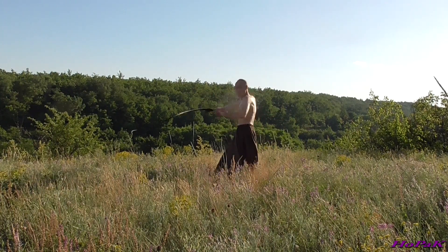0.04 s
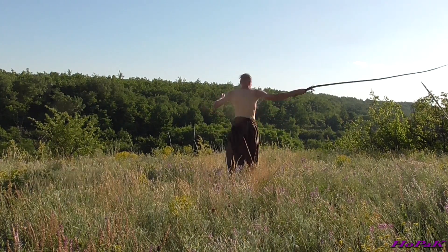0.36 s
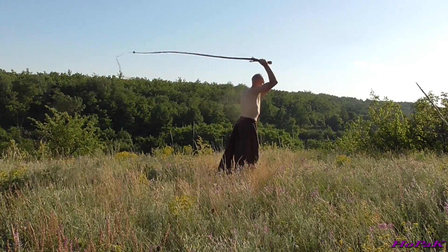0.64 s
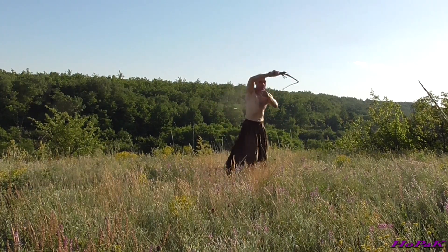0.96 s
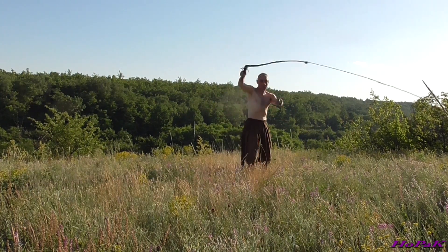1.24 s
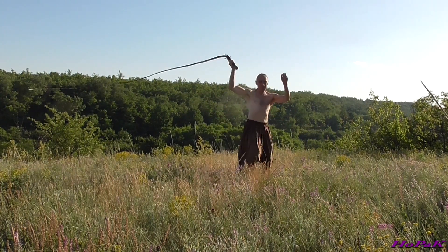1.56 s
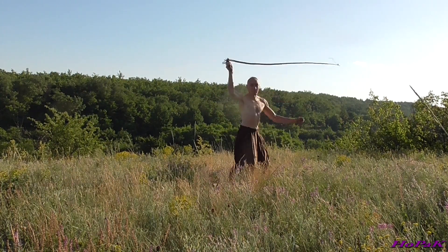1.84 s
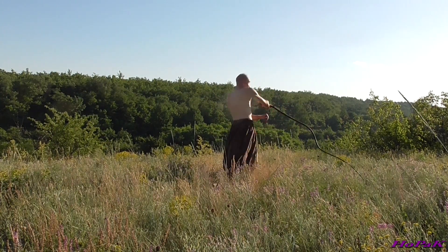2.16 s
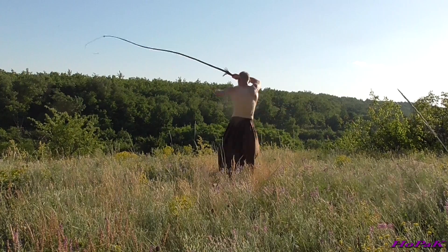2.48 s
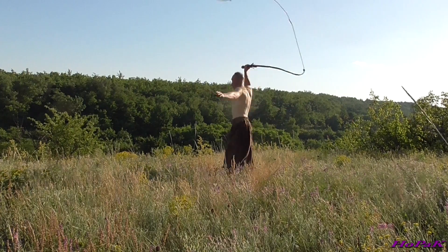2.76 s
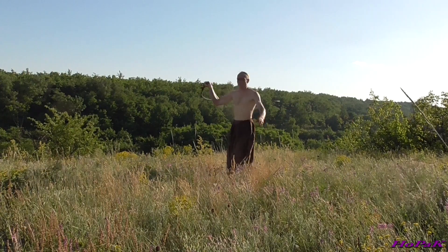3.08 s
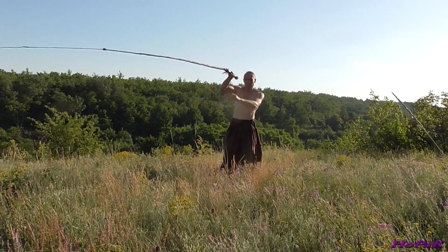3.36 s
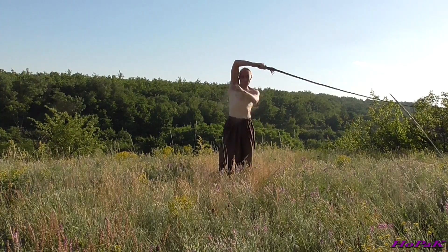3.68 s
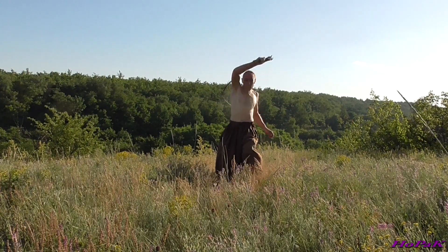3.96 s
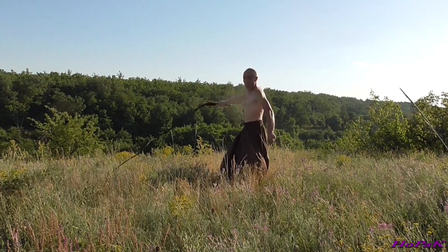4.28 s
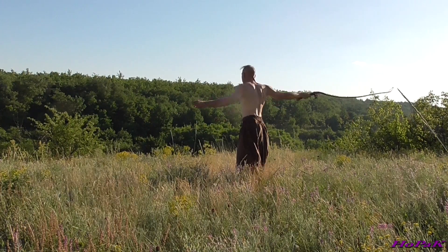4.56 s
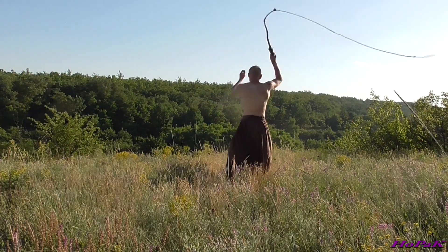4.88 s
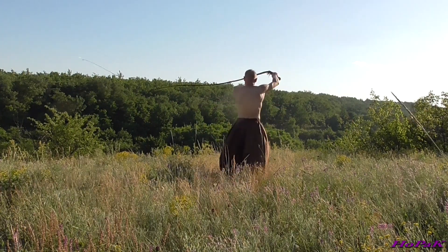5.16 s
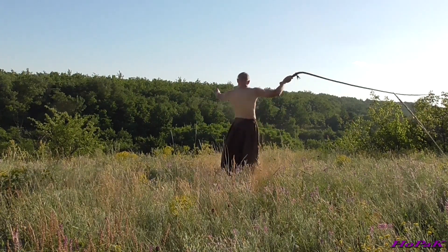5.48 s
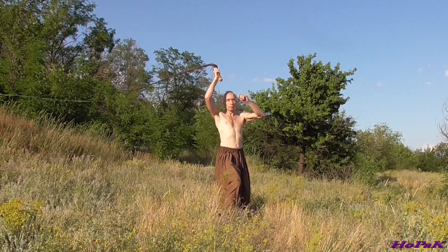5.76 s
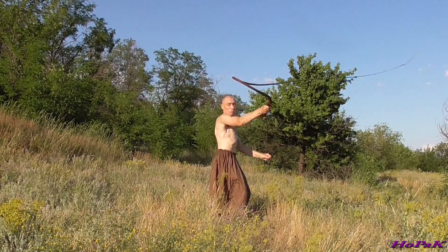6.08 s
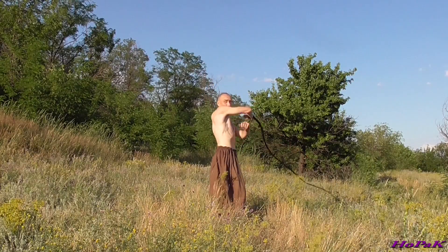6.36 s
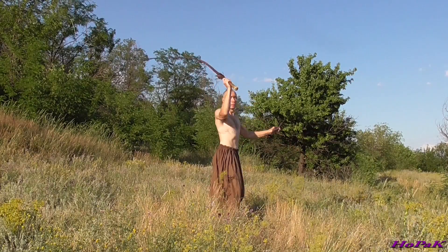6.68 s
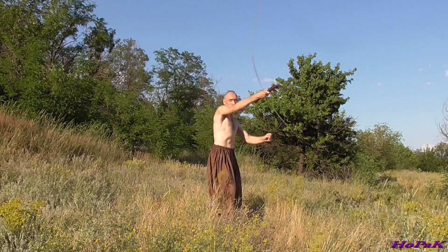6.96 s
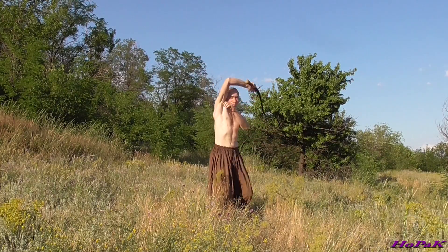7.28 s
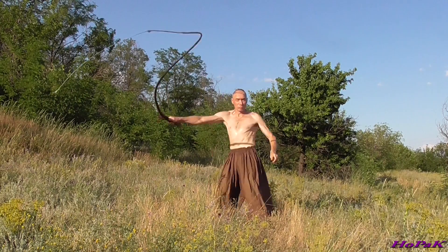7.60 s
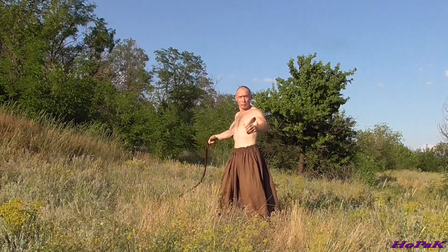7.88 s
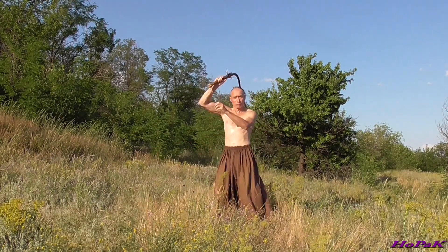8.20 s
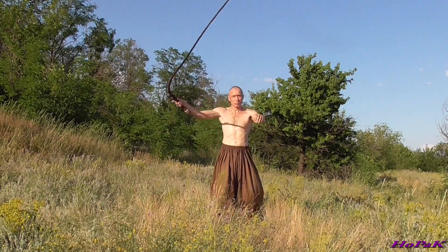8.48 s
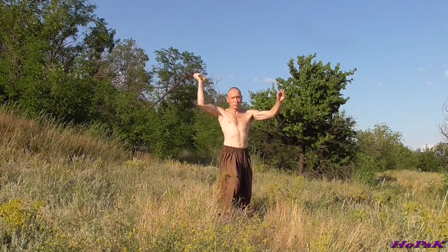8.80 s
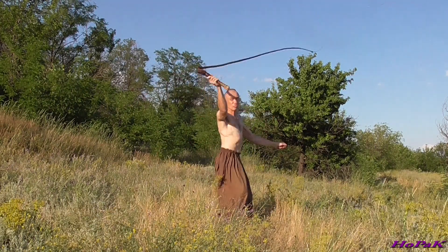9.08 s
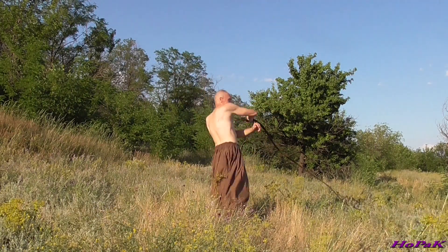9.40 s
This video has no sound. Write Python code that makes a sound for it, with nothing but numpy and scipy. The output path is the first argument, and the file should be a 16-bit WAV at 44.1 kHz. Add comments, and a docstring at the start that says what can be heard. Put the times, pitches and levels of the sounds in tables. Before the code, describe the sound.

A long whip cracks six times in an open meadow, a few metres from the microphone, with one and a half to two seconds between cracks. Each crack is sharp and dry, followed by a faint, dull echo from the trees. In between, the whip swings past with soft whistling swishes and a few light snaps, busier in the second half. Light wind and rustling grass lie quietly underneath.

```python
"""A long whip cracks six times in a meadow at the edge of a wood, a few metres from the microphone.
Before each crack the tip rushes up to the speed of sound and throws a shock; on every swing the thong
sheds whistling vortices. The grass scatters each crack at once and the trees send it back late and dull,
from far off for the first three and from close by for the rest. Light snaps and patches of hiss come and
go over rustling stalks and light wind. The level dips briefly just after the first crack."""
import sys
import numpy as np
from scipy import signal
from scipy.fft import rfft, irfft
from scipy.io import wavfile
from scipy.ndimage import uniform_filter1d, map_coordinates

SR = 44100
rng = np.random.default_rng(int(sys.argv[2]) if len(sys.argv) > 2 else 0)


def generate_wav(signal):
    """Clip the signal to [-1, 1] and save it as 16-bit WAV at the path in sys.argv[1]."""
    frames = np.transpose(np.atleast_2d(signal))
    scaled = np.clip(frames, -1, 1) * 32767
    pcm = np.round(scaled).astype(np.int16)
    wavfile.write(sys.argv[1], SR, pcm)


N = 416304
SIDES = np.array([[.5], [-.5]])  # splits a left-minus-right difference between the channels

# The rush of the thong before a crack. Each row: frequency in Hz, level in dB.
RUN_UP_SPECTRUM = [(40, -1), (150, 4), (300, 3.5), (600, -2), (1500, -36), (2300, -11.5), (3600, -1.5),
                   (6000, -13), (11000, -9.5), (16000, -23.5)]
# The tip tearing the air; also the grit of a snap. Each row: frequency in Hz, level in dB.
BURST_SPECTRUM = [(60, -16), (300, -5), (1200, 11), (2400, -13), (4200, 0), (6500, -4), (11000, -2),
                  (16000, -11)]
# Cracks, a few metres from the microphone. Each row: time in seconds, run-up in dB, shock in dB,
# shock length in ms, ground bounce delay in ms, bounce share, lag on the right in ms,
# left minus right in dB, nearby scatter in dB, wood echo in dB, wood delay in seconds.
CRACKS = [ (.1570, -28.5, 6.5, 0.7, 0.3, 0.34, 0.54, -4, -36.5, -43.5, 0.34),
          (2.2116, -25.5, -2.5, 0.97, 2.6, 0.23, 0.13, -1, -43.5, -45, 0.83),
          (4.3554, -26, -5, 2.8, 0.26, 0.81, 0.27, -7, -38, -43.5, .26),
          (6.3441, -24.5, 1, 1.04, 1.05, 0.48, 0.14, 2.5, -49, -52.5, 0.31),
          (7.8120, -24, -2.5, 2.71, 1.27, 0.13, 0, -2.5, -43.5, -41.5, 0.44),
          (9.4050, -22.5, 4.5, 0.89, 1.76, 0.78, 0.27, 1, -35.5, -41, .40)]


def crack(run_db, shock_db, length_ms, bounce_ms, bounce, lag_ms, pan_db, run_s=.018, burst_db=-13):
    """A loop races down the thong, the tip tears the air, and a shock arrives with its ground bounce."""
    t = np.arange(-SR // 10, SR // 10) / SR
    gather_db = np.interp(t / run_s, [-5, -1.3, -1, -.4, 0, .5], [-43, -19.5, -2, .5, 5, -11])
    # the tip's vortex tone climbs about two octaves as it gathers speed
    scream_hz = 4500 * 2 ** (120 * np.clip(t, -run_s, 0))
    scream = undb(-3) * vortex_tone(scream_hz, width_hz=900) * (t < 0)
    rush = noise(len(t), RUN_UP_SPECTRUM, side_db=-11)
    run_up = (rush + scream) * undb(run_db + gather_db - 350 * np.maximum(t, 0))
    # equally loud in every crack: the tip always reaches the speed of sound
    burst = noise(len(t), BURST_SPECTRUM, side_db=-11.5) * undb(burst_db) * bell(t + .0016, .0025)
    arrival = t + SIDES * lag_ms / 1000
    length = length_ms / 1000
    boom = shock(arrival, length) + bounce * shock(arrival - bounce_ms / 1000, length)
    # the air shoved aside follows as a slow, soft push
    wake = undb(shock_db - 20) * bell(t - length / 2, .0024)
    return run_up + burst + wake + undb(shock_db + SIDES * pan_db) * boom


def shock(t, length, front_s=.00008):
    """N-wave: a jump up in pressure, a straight fall below zero, a jump back."""
    fronts = (np.tanh(t / front_s) - np.tanh((t - length) / front_s)) / 2
    return (1 - 2 * np.clip(t / length, 0, 1)) * fronts


# Swings past the microphone: the thong coasts and its whistle sinks; the row at 0.669 s adds the low waist tone
# leading the swing at 0.769 s. # Each row: loudest moment in seconds, length in seconds, pitch in Hz, level in
# dB, left minus right in dB.
SWINGS = [ (0.021, 0.092, 824, -50.5, 2.5), (0.669, .11, 460, -49.5, -3), (0.769, .13, 820.5, -45.5, 0),
          (1.08, .05, 888, -47.5, 1), (1.18, 0.081, 726, -45.5, -0.5), (1.312, 0.089, 1131, -46, -2.5),
          (1.425, .11, 799, -41, -1.5), (1.628, 0.17, 675, -53, 5), (2.06, 0.12, 842, -52, -2),
          (2.514, 0.018, 1528, -35, -1.5), (2.656, 0.14, 783, -50.5, 4), (3.0, 0.061, 798, -42.5, -2),
          (3.27, .1, 983, -46.5, 5.5), (3.479, 0.19, 802, -50, 4), (3.668, 0.13, 634, -44, -3.5),
          (4.268, 0.13, 708, -46.5, -2.5), (4.951, .1, 678, -53, -4), (5.089, .15, 552.5, -47, -2),
          (6.181, .22, 898, -58, 2), (7.065, .045, 951, -44.5, 3), (7.137, 0.04, 1305, -31.5, 1),
          (7.169, 0.017, 1602, -29, 1), (7.741, .11, 598, -52, 5), (8.619, 0.032, 586, -42.5, 0),
          (8.664, .028, 1952, -34.5, 0.5), (8.685, .024, 1124, -28.5, 2.5), (8.71, .035, 1503, -30, 1.5),
          (9.285, 0.037, 1005, -45.5, 0), (9.351, 0.078, 490, -48, .5)]


def swing(length, pitch_hz, db, pan_db):
    """Air drag slows a faster thong sooner; it also stirs the air more unevenly and its thin end sings."""
    speed = pitch_hz / 800  # 1 for a usual swing
    return thong(length, pitch_hz, db, pan_db, glide_oct_per_s=-2.9 * speed ** 1.5,
                 width=.085 * speed ** .55, thin_db=-16.5 + 6.5 * np.log2(speed))


# Throws past the microphone: the whistle climbs. Each row: loudest moment in seconds,
# length in seconds, pitch in Hz, level in dB, left minus right in dB.
THROWS = [(2.93, .1, 600, -42.5, -2), (5.439, 0.045, 1054, -40.5, 0.5), (5.532, .014, 1250, -42, -0.5),
          (5.832, 0.026, 794, -52.5, 5), (6.719, .045, 931, -50.5, 6), (6.763, 0.021, 1054, -31.5, 3.5),
          (7.121, .028, 700, -38.5, 1.5), (7.482, .05, 948, -47.5, 2), (9.201, 0.053, 851, -44.5, -3)]


def throw(length, pitch_hz, db, pan_db):
    """The arm speeds the thong up; a shorter throw whistles more purely."""
    return thong(length, pitch_hz, db, pan_db, glide_oct_per_s=3.5,
                 width=.085 * np.sqrt(length / .05), thin_db=-25)


def thong(length, pitch_hz, db, pan_db, glide_oct_per_s, width, thin_db):
    """The tapered thong whistles low at its thick belly and high at its thin end."""
    t = np.arange(-SR // 2, SR // 2) / SR
    rise, fall = .36 * length, .64 * length
    swell = 1 / np.cosh(1.33 * t / np.where(t < 0, rise, fall))
    swell *= undb(1.6 * walk(len(t), 45) - .3)
    hz = pitch_hz * 2 ** (glide_oct_per_s * np.clip(t, -2 * rise, 2 * fall))
    spread_hz = 1.7 * width * pitch_hz
    core = vortex_tone(hz, spread_hz)
    skirt = undb(-8) * vortex_tone(hz, 4 * spread_hz)
    thin_end = undb(thin_db) * vortex_tone(2 * hz, 5 * spread_hz)
    belly = undb(-13.5) * vortex_tone(.3 * hz, spread_hz / 2)
    waist = undb(-13) * vortex_tone(.57 * hz, .57 * spread_hz)
    # a longer, wider stroke brings the heavy part into play
    heavy = (belly + waist) * undb(3 * np.log2(length / .13))
    # the motion runs outwards, so the heavy part sounds first and for longer
    heavy_swell = np.interp((t + .53 * length) / 1.54, t, swell)
    tone = (core + skirt + thin_end) * swell + heavy * heavy_swell
    hiss = undb(-28) * noise(len(t), GRASS_SPECTRUM, side_db=-24) * swell
    # the louder side hears the tone up to a few samples earlier
    stereo = np.array([tone, np.roll(tone, int(round(.8 * pan_db)))])
    return (stereo + hiss) * undb(db + SIDES * pan_db)


# Faint whistles of the cord at the tip. Each row: middle in seconds, length in seconds,
# top pitch in Hz, level in dB.
CORD_WHISTLES = [(4.057, 0.077, 3626, -65), (6.156, 0.15, 1980, -67), (6.822, 0.082, 2940, -59),
                 (6.858, 0.037, 2340, -64), (6.988, 0.029, 2720, -56), (7.073, .11, 3220, -53.5),
                 (7.53, 0.15, 2035, -61.5)]


def cord_whistle(length, top_hz, db):
    """The thin cord speeds up and slows down, so its pitch arches; a longer whistle sags further."""
    position = np.linspace(-1, 1, int(length * SR))
    sag_octaves = 2.1 * length * position ** 2
    return undb(db) * np.sqrt(1 - position ** 2) * vortex_tone(top_hz * 2 ** -sag_octaves, width_hz=130)


# Light snaps, clicks and dull thuds. Each row: start in seconds, treble in dB, thud in dB.
SNAPS_AND_THUDS = [(.404, -38, -36.5), (1.953, -64, -45), (2.499, -51, -42), (4.646, -42.5, -49),
                   (6.09, -48, -42), (6.198, -49, -62), (7.161, -34, -42), (7.186, -25, -50),
                   (7.843, -39, -62), (8.331, -52, -43), (8.783, -28.5, -40)]


def snap_and_thud(treble_db, thud_db, t60=.067):
    """A gritty burst over a low thud, both dying quickly."""
    t = np.arange(SR // 3) / SR
    grit = noise(len(t), BURST_SPECTRUM, side_db=-10.5) * undb(treble_db + 3.4 * walk(len(t), 570))
    thud = noise(len(t), LOW_AIR_SPECTRUM, side_db=-22) * undb(thud_db)
    return (grit + thud) * (1 - np.exp(-t / .00034)) * undb(-60 * t / t60)


# The colour of the grainy hiss. Each row: frequency in Hz, level in dB.
HISS_SPECTRUM = [(100, 8.5), (1000, 4.5), (2500, -7.5), (4200, 1), (6500, -1.5), (9500, 1), (13000, 0),
                 (16000, -18)]
# Short patches of hiss, some just after a crack or snap. Each row: middle in seconds,
# length in seconds, level in dB.
HISS_PATCHES = [(0.749, 0.12, -56.5), (1.524, 0.19, -58), (3.111, 0.035, -53), (3.631, 0.11, -57),
                (4.381, 0.047, -40), (6.392, 0.067, -45.5), (7.161, 0.13, -44), (7.253, 0.15, -48.5),
                (8.695, 0.11, -45), (8.824, 0.087, -41.5)]


def hiss_patch(length, db, steepness=4.5, grain_db=2):
    """Grainy hiss that swells and stops quickly."""
    t = np.arange(-SR // 4, SR // 4) / SR
    swell = np.exp(-np.abs(2 * t / length) ** steepness)
    return noise(len(t), HISS_SPECTRUM, side_db=-8.5) * swell * undb(db + grain_db * walk(len(t), 600))


# Scatter off nearby grass and bushes; also the thong's hiss. Each row: frequency in Hz, level in dB.
GRASS_SPECTRUM = [(50, -16), (200, -21), (1200, 4.5), (2400, -4.5), (4000, -5), (6500, -7.5), (10000, -6.5),
                  (16000, -18.5)]
# The echo from the wood, its treble lost on the way. Each row: frequency in Hz, level in dB.
WOOD_SPECTRUM = [(50, -29.5), (200, -14), (500, -3.5), (1200, 2.5), (1550, -4.5), (2300, -10),
                 (3000, -14.5), (5000, -20.5), (7000, -38), (16000, -60)]
# The wood, far from the microphone and close to it. Each gives: swell in seconds, t60 in seconds,
# slap off the front trees and hiss off their leaves, both in dB against the wood echo.
FAR_WOOD, NEAR_WOOD = (.35, 2.08, -16, -20.5), (.07, 3.5, -6, -10)
NEAR_WOOD_FROM_S = 5.9


def echo(bush_db, wood_db, delay, swell_s, wood_t60, slap_db, leaf_db, grass_t60=.15, bush_t60=1.105):
    """Countless small reflections reach the microphone: grass at once, bushes after it, the wood late."""
    t = np.arange(2 * SR) / SR
    grass = undb(bush_db + 13 - 60 * t / grass_t60) * noise(len(t), GRASS_SPECTRUM, side_db=1.3)
    bushes = undb(bush_db - 60 * t / bush_t60) * noise(len(t), GRASS_SPECTRUM, side_db=-2)
    bushes *= 1 - np.exp(-t / .016)
    swell = np.exp(-(np.minimum(t - delay, 0) / swell_s) ** 2 / 2)
    decay = undb(-60 * np.maximum(t - delay, 0) / wood_t60)
    slap = undb(slap_db) * bell(t - delay + .068 / 3, .068)
    wood = (swell * decay + slap) * (1 - np.exp(-t / .06)) * noise(len(t), WOOD_SPECTRUM, side_db=-5)
    # the nearest leaves answer a little earlier and keep the treble
    leaves = undb(leaf_db) * bell(t / delay - .73, .44) * noise(len(t), RUSTLE_SPECTRUM, side_db=-1.5)
    # single trunks and crowns stand out of the wash
    trunks = undb(1.5 * walk(len(t), 50) + 1.9 * walk(len(t), 450) - .5)
    return (grass + bushes + undb(wood_db) * (wood + leaves)) * trunks


# Stalks, leaves and cloth around the microphone. Each row: frequency in Hz, level in dB.
RUSTLE_SPECTRUM = [(300, -1), (1500, 4.5), (4500, 6.5), (7000, 3), (12000, 7.5), (16000, -10)]


def rustle(stalks_db=-72, cloth_db=-66, cloth_s=.12, grain_db=2):
    """Dry stalks rustle steadily in fine grains, and cloth joins in with each stroke of the arm."""
    t = np.arange(N) / SR
    arm_motion = np.tanh(sum(bell(t - s, cloth_s) for s, *_ in SWINGS + THROWS))
    level = undb(stalks_db) + undb(cloth_db) * arm_motion
    return noise(N, RUSTLE_SPECTRUM, side_db=-5.5) * level * undb(grain_db * walk(N, 800))


# Wind over the meadow; also the colour of the thuds. Each row: frequency in Hz, level in dB.
LOW_AIR_SPECTRUM = [(20, -21), (50, -6.5), (100, -2), (190, 1), (330, -6), (800, -7), (1400, -15.5),
                    (2500, -30), (8000, -27)]


def wind(db=-57):
    """Light wind murmurs low and steady."""
    return noise(N, LOW_AIR_SPECTRUM, side_db=-4) * undb(db)


def vortex_tone(hz, width_hz):
    """Vortices leave a cord at a rate set by its speed; the tone is as wide as the flow is uneven."""
    phase = 2 * np.pi * np.cumsum(hz) / SR
    return walk(len(hz), width_hz) * np.cos(phase) + walk(len(hz), width_hz) * np.sin(phase)


def noise(size, spectrum, side_db):
    """Stereo noise, coloured without changing its power; side_db sets how much the channels differ."""
    mid, side = rng.standard_normal((2, size))
    white = mid + undb(side_db) * side * np.array([[1], [-1]])
    hz, db = np.transpose(spectrum)
    gain = undb(np.interp(np.log(np.fft.rfftfreq(size, 1 / SR) + 1), np.log(hz), db))
    return irfft(rfft(white) * gain / np.sqrt(np.mean(gain ** 2)), size)


def walk(size, rate_hz):
    """A smooth random curve with a spread near 1."""
    steps = np.arange(size) * rate_hz / SR
    return 1.1 * map_coordinates(rng.standard_normal(2 ** 13), [steps % 2 ** 13], order=3, mode="wrap")


def bell(x, width):
    """A Gaussian bump around zero."""
    return np.exp(-(x / width) ** 2)


def undb(db):
    """Decibels to gain."""
    return 10 ** (np.asarray(db) / 20)


def add(out, start, sound):
    """Mix a sound in from a start in seconds."""
    offset = int(round(start * SR))
    first, last = max(offset, 0), min(offset + sound.shape[-1], N)
    if last > first:
        out[:, first:last] += sound[..., first - offset:last - offset]


def scene():
    """The whip over the meadow; sounds centred on their time start half their span early."""
    out = rustle() + wind()
    for s, *stroke, bush_db, wood_db, delay in CRACKS:
        wood = FAR_WOOD if s < NEAR_WOOD_FROM_S else NEAR_WOOD
        add(out, s - .1, crack(*stroke))
        add(out, s, echo(bush_db, wood_db, delay, *wood))
    for s, *stroke in SWINGS:
        add(out, s - .5, swing(*stroke))
    for s, *stroke in THROWS:
        add(out, s - .5, throw(*stroke))
    for s, length, top_hz, db in CORD_WHISTLES:
        add(out, s - length / 2, cord_whistle(length, top_hz, db))
    for s, length, db in HISS_PATCHES:
        add(out, s - .25, hiss_patch(length, db))
    for s, treble_db, thud_db in SNAPS_AND_THUDS:
        add(out, s, snap_and_thud(treble_db, thud_db))
    return out


def record(dry, low_cut_hz=95, top_hz=15900, ceiling=.92, dip_from_s=.161, dip_to_s=.213):
    """The level dips briefly once; the microphone thins the bass, rounds the peaks and cuts the top."""
    t = np.arange(N) / SR
    dip = np.where((t > dip_from_s) & (t < dip_to_s), undb(-38), 1.)
    dipped = dry * uniform_filter1d(dip, SR // 250)
    thinned = signal.sosfilt(signal.butter(2, low_cut_hz, "high", fs=SR, output="sos"), dipped)
    rounded = ceiling * np.tanh(thinned / ceiling)
    return signal.sosfilt(signal.ellip(8, .2, 70, top_hz, fs=SR, output="sos"), rounded)


dry = scene()
out = record(dry)
generate_wav(out)
```